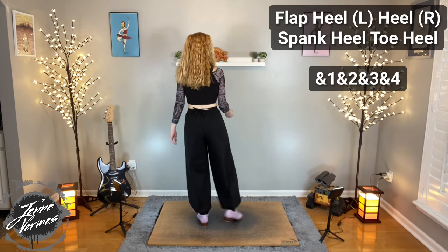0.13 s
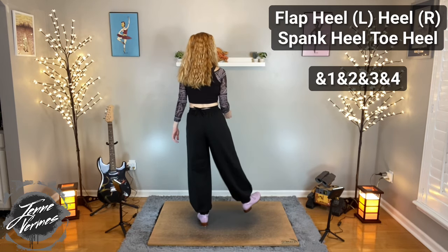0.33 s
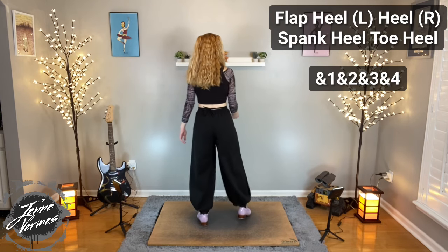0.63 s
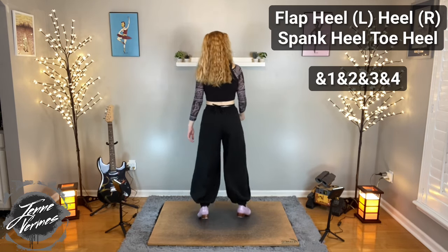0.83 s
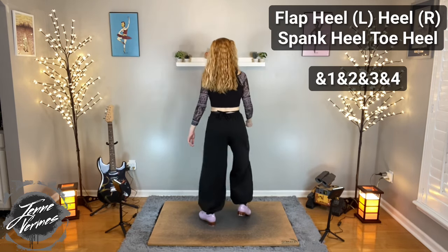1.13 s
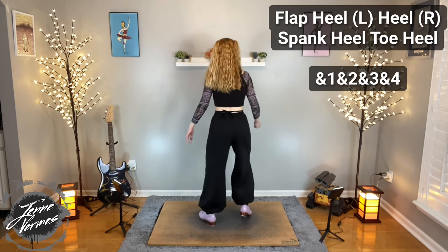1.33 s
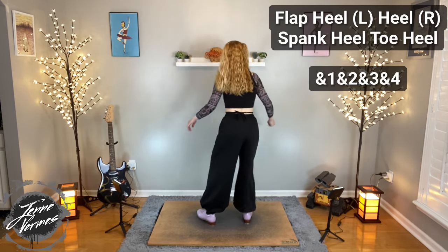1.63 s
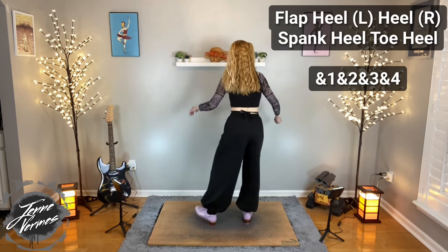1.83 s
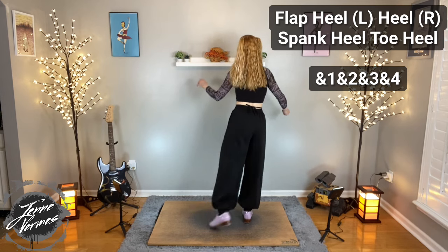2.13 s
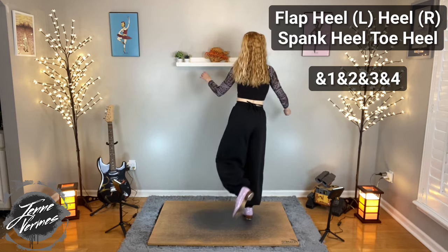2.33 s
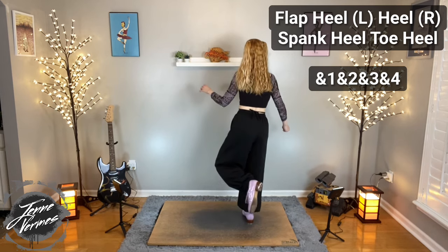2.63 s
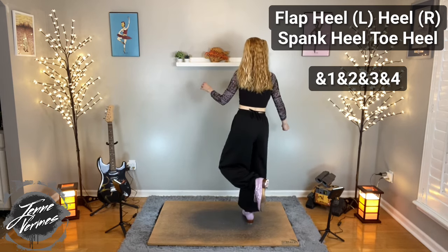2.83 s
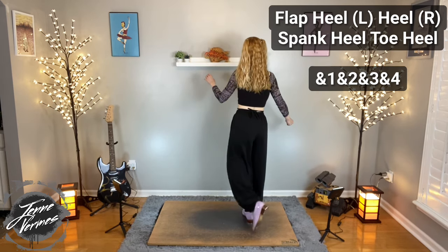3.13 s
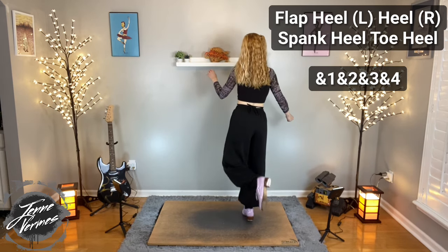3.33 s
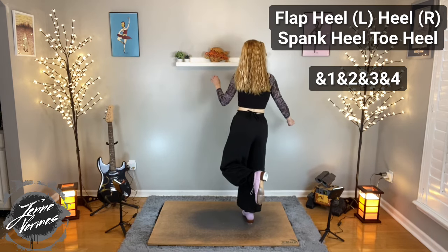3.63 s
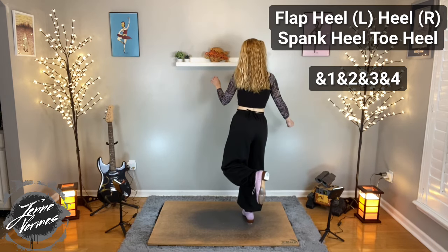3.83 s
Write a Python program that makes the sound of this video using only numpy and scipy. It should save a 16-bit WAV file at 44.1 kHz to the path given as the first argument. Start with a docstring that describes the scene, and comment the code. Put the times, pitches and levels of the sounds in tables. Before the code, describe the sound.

Slow, even tap shoe clacks on a wooden board, each ringing briefly in the room.

```python
"""A faint hum fills a bare room. A dancer in tap shoes starts on a wooden practice board with a
brush (a forward swing), then strikes about every half second: the ball of the foot, two heel drops,
a spank (a backward swing), a heel, the toe tip and a last heel. Each time the metal tap clacks on
the wood, the dancer's weight thumps the board, and the walls ring on for about half a second."""
import sys
import numpy as np
from scipy import signal
from scipy.fft import rfft, irfft
from scipy.io import wavfile
from scipy.ndimage import uniform_filter1d

SR = 44100
rng = np.random.default_rng(int(sys.argv[2]) if len(sys.argv) > 2 else 0)


def unload_wav(signal):
    """Save mono or channel-first audio to the path in sys.argv[1] as 16-bit WAV at rate SR, clipped to [-1, 1]."""
    wavfile.write(
        sys.argv[1],
        SR,
        np.round(np.clip(np.atleast_2d(signal).T, -1, 1) * 32767).astype(np.int16),
    )


N = 176400  # 4 seconds

# The tone of the room's soft background noise (frequency [Hz], relative level [dB])
AIR_TONE = [(20, -11.5), (40, -11), (75, -11), (170, -23), (420, -16.5), (700, -27), (2500, -37),
            (5000, -40.5), (9000, -54), (15000, -62)]
# How long the room rings (frequency [Hz], time to fade by 60 dB [s])
ROOM_FADE = [(50, 0.26), (120, .42), (250, 0.56), (560, 0.65), (1200, 0.7), (2500, .53), (5000, 0.5),
             (8000, 0.43), (14000, 0.22)]
# First echoes from the floor, walls and ceiling (rough delay [s], level [dB])
FIRST_ECHOES = [(.0011, -12.5), (.0055, -10.5), (.0068, -14.5), (.0095, -18), (.0145, -14.5),
                (0.0168, -16.5)]
# Low notes of the board and floor (frequency [Hz], base level [dB], time to fade by 60 dB [s])
BOARD_NOTES = [(54.7, -27.5, 0.71), (99, -30, 0.45), (107.3, -24, 0.35), (142.5, -16.5, .34),
               (204, -32.5, 0.12), (107, -52, 5.9)]
# The overall tone of a blow from each part of the shoe (frequency [Hz], relative level [dB])
SHOE_TONES = { "heel": [(30, 9.5), (70, 21), (100, 40), (160, 27.5), (230, 33), (450, 26), (650, 20.5),
              (1500, 18), (2400, 7), (4000, 3), (8000, 0), (10500, -10), (15000, -17.5)], "brush": [(30, 4),
              (70, 4), (120, 18), (260, 23), (500, 28.5), (850, 21), (1800, 24), (3000, 18), (5000, 7),
              (9000, -3.5), (15000, -16)], "ball": [(30, 12), (70, 4.5), (120, 14.5), (260, 23), (600, 25),
              (1500, 29), (2500, 24), (5000, 22.5), (8000, 16), (11000, 9), (15000, -8)],
              "spank": [(30, -3), (70, -13), (120, 22.5), (260, 22), (600, 28), (1500, 27.5), (2600, 29.5),
              (4200, 19.5), (8000, 10.5), (11000, 4), (15000, -14.5)], "tip": [(30, 0.5), (70, 23.5),
              (110, 32.5), (200, 35.5), (400, 35.5), (850, 27.5), (1500, 28.5), (2200, 21), (3500, 14.5),
              (5500, -2.5), (10000, -14.5), (15000, -29.5)]}
# The eight strikes (time [s], shoe part, level [dB], treble [dB], weight on the board at WEIGHT_HZ [dB],
# how squarely the tap faces the listener [dB], resonances). Resonances are the pitches at which
# tap and sole ring (frequency [Hz], width [Hz], lift before scaling by ring depth [dB]).
TAP_STRIKES = [ (0.0706, "brush", 0.95, -4.5, -11.5, 1.5, [(453, 63, 3), (610, 51, 5.5), (1057, 370, 7.5),
               (1773, 320, 7.5), (2380, 330, 6), (12000, 1900, 4)]),
               (0.5805, "ball", 0.74, -9, -11.5, -6, [(414, 39, 6.5), (760, 49, 4.5), (1433, 220, 2),
               (1745, 300, 6), (2720, 240, 7), (3810, 660, 5.5), (14000, 1500, 12)]),
               (1.0611, "heel", -0.12, -1.4, -4.5, -1.5, [(242, 110, 3.5), (579, 360, 8.5), (1094, 160, 4),
               (1760, 400, 6.5), (2900, 1300, 4.5), (9200, 1800, 5)]),
               (1.5539, "heel", -0.22, -0.88, -2.5, 1, [(640, 120, 4), (1005, 500, 8.5), (1650, 270, 7),
               (4000, 890, 4), (6700, 2300, 5), (13370, 2500, 2.5)]),
               (2.0542, "spank", 0.5, -5.6, -10.5, -0.5, [(367, 31, -1.5), (780, 50, 6), (1337, 130, 7),
               (2126, 270, 8), (3150, 380, 2.5), (5410, 1050, 3.5)]),
               (2.5377, "heel", 0.12, -4, -3.5, 1, [(364.5, 34, 9.5), (1075, 440, 7), (1790, 300, 10),
               (5000, 1200, 7), (6940, 1070, 0), (14400, 2000, -3)]),
               (3.0348, "tip", 0.45, 1, -8, -7, [(241, 65, 5.5), (477, 127, 7.5), (628, 106, 9),
               (780, 60, 4), (1120, 85, 13), (1334, 230, 8), (1763, 150, 1)]),
               (3.5363, "heel", 0.46, -0.16, -1.5, 1, [(203, 26, 5), (445, 80, 5.5), (1139, 520, 11),
               (1570, 160, 7), (5000, 810, 1.5), (7190, 1800, 6), (13300, 1930, 1)])]

AIR_DB, HUM_DB, HUM_HZ, HUM_WIDTH_HZ = -66.5, -66, 57.5, 5
DIRECT_DB, TAIL_DB, SCATTER_DB = -10.5, -2, -3.5
TAIL_RISE_S, SCATTER_S, ECHO_SPREAD_S = 0.005, 0.011, 0.00037
BEAM_DB, BEAM_HZ = 5, 2600  # the tap beams its treble: direct sound and echoes are brighter than the tail
BOARD_RISE_S, WEIGHT_HZ = 0.012, 104.9
CHATTER_S, BEND_S = 0.00022, 0.00045  # BEND_S: delay of the board's bending waves at 1 kHz
TREBLE_HZ, TOP_HZ = 2500, 16300
RING_NEAR, RING_FAR = 1.47, 0.9  # ring depth straight from the shoe, and averaged over the room


def amp(db):
    """Turns decibels into a number to multiply a sound by."""
    return 10 ** (np.asarray(db) / 20)


def look_up(table, hz):
    """Reads between the rows of a table, with frequency spaced like musical pitch."""
    frequencies, values = np.transpose(table)
    return np.interp(np.log(hz + 1), np.log(frequencies), values)


def add(mix, start_s, sound):
    """Mixes a sound in at the given time."""
    part = mix[round(start_s * SR):][:len(sound)]
    part += sound[:len(part)]


def treble_shelf(hz, corner_hz, db):
    """A curve in dB that turns the treble up or down and leaves the bass alone."""
    return db * hz ** 2 / (hz ** 2 + corner_hz ** 2)


def sharp_pulse(db):
    """The sharpest pulse that has these levels from bass to treble."""
    log_gain = np.log(amp(np.concatenate([db, db[-2:0:-1]])))
    spectrum = np.exp(np.conj(signal.hilbert(log_gain)))
    return irfft(spectrum[:len(db)])


def even_out(sound, size=70):
    """Makes bass and treble equally strong but keeps the small peaks and dips."""
    power = uniform_filter1d(abs(rfft(sound)) ** 2, size)
    opposite_db = -10 * np.log10(abs(power) + 1e-9)
    return signal.fftconvolve(sound, sharp_pulse(opposite_db))[:len(sound)]


def noise(gains):
    """Steady noise of strength 1, shaped by a gain for each frequency."""
    shaped = irfft(rfft(rng.standard_normal(N)) * gains, N)
    return shaped / shaped.std()


def room_tone():
    """The background: faint air and a low, wavering hum."""
    hz = np.fft.rfftfreq(N, 1 / SR)
    hum = noise(1 / (1 + (2 * (hz - HUM_HZ) / HUM_WIDTH_HZ) ** 2))
    air = noise(amp(look_up(AIR_TONE, hz)))
    return amp(AIR_DB) * air + amp(HUM_DB) * hum


def room_reverb():
    """Countless bounces off the walls blur into a quick scatter of sound and a fading tail."""
    t = np.arange(SR) / SR
    hz, slice_s, bands = signal.stft(rng.standard_normal(SR), SR, nperseg=256)
    fade_s = look_up(ROOM_FADE, hz)[:, None]
    fading = bands * amp(-60 * slice_s / fade_s) / np.sqrt(fade_s)
    tail = signal.istft(fading, SR, nperseg=256)[1][:SR]
    tail *= 1 - np.exp(-t / TAIL_RISE_S)
    scatter = rng.standard_normal(SR) * t * np.exp(-t / SCATTER_S)
    reverb = amp(TAIL_DB) * tail / np.linalg.norm(tail)
    reverb += amp(SCATTER_DB) * scatter / np.linalg.norm(scatter)
    return even_out(reverb) * np.linalg.norm(reverb)


def direct_and_echoes(facing_db):
    """Sound reaches the ear straight from the shoe, then off the floor, walls and ceiling."""
    arrivals = np.zeros(SR)
    arrivals[0] = amp(DIRECT_DB + facing_db)
    for delay_s, db in FIRST_ECHOES:
        add(arrivals, abs(delay_s + ECHO_SPREAD_S * rng.uniform(-1.2, 1)), amp([db]))
    hz = np.fft.rfftfreq(256, 1 / SR)
    beam = sharp_pulse(treble_shelf(hz, BEAM_HZ, BEAM_DB))
    return signal.fftconvolve(arrivals, beam)[:SR]


def board_thump(weight_db):
    """Board and floor swing under the dancer; the lower the note, the more the weight matters."""
    t = np.arange(2 * SR) / SR
    swing = np.zeros(len(t))
    for hz, db, fade_s in BOARD_NOTES:
        start_db = db + weight_db * WEIGHT_HZ / hz
        swing += amp(start_db - 60 * t / fade_s) * np.sin(2 * np.pi * hz * t)
    return -swing * (1 - np.exp(-t / BOARD_RISE_S))


def tap_landing():
    """The tap chatters for an instant as it lands; in the board the treble runs ahead of the bass."""
    t, hz = np.arange(4096) / SR, np.fft.rfftfreq(4096, 1 / SR)
    chatter = even_out(rng.standard_normal(len(t)) * np.exp(-t / CHATTER_S), size=21)
    phase_lag = 4 * np.pi * BEND_S * np.sqrt(1000 * hz)
    return irfft(rfft(chatter) * np.exp(-1j * phase_lag))[:len(t) // 2]


def tap_clack(part, treble_db, resonances, ring_depth):
    """The tap hits the wood and rings briefly, at pitches set by its angle and where it lands."""
    hz = np.fft.rfftfreq(4096, 1 / SR)
    db = look_up(SHOE_TONES[part], hz) + treble_shelf(hz, TREBLE_HZ, treble_db)
    for centre_hz, width_hz, lift_db in resonances:
        db += ring_depth * lift_db / (1 + (2 * (hz - centre_hz) / width_hz) ** 2) ** 2
    return -sharp_pulse(db)


def scene():
    """Eight strikes over the hum; each lands on a new spot, so each gets its own echoes."""
    mix = room_tone()
    for start_s, part, db, treble_db, weight_db, facing_db, resonances in TAP_STRIKES:
        landing = amp(db) * tap_landing()
        reverb = room_reverb()
        direct = direct_and_echoes(facing_db)
        for path, ring_depth in ((direct, RING_NEAR), (reverb, RING_FAR)):
            blow = signal.fftconvolve(landing, tap_clack(part, treble_db, resonances, ring_depth))
            add(mix, start_s, signal.fftconvolve(blow, path))
        add(mix, start_s, board_thump(weight_db))
    return mix[None]


def record(dry):
    """Flattens any peak that is too loud, then cuts the treble above TOP_HZ."""
    lowpass = signal.firwin(301, TOP_HZ, window=("kaiser", 8), fs=SR)
    return signal.oaconvolve(np.clip(dry, -1, 1), lowpass[None], "same")


dry = scene()
out = record(dry)
unload_wav(out)
```